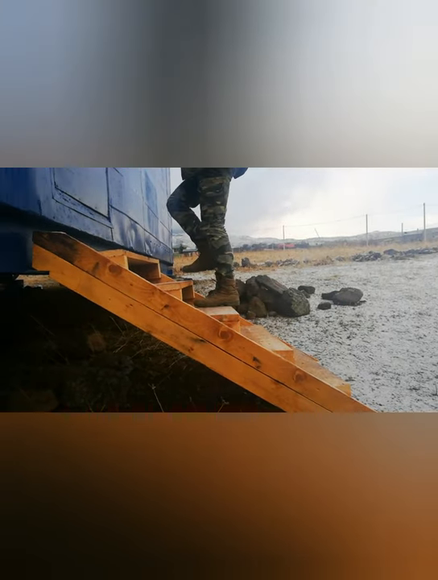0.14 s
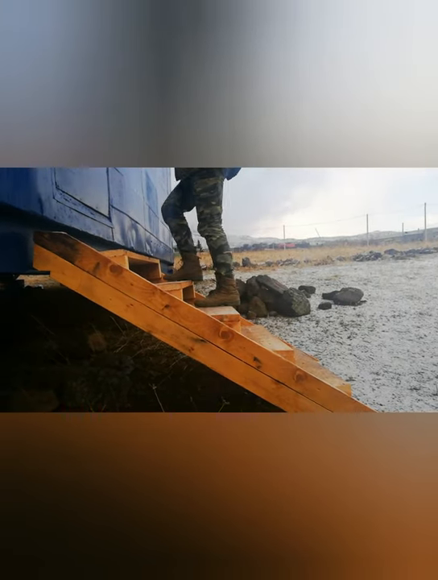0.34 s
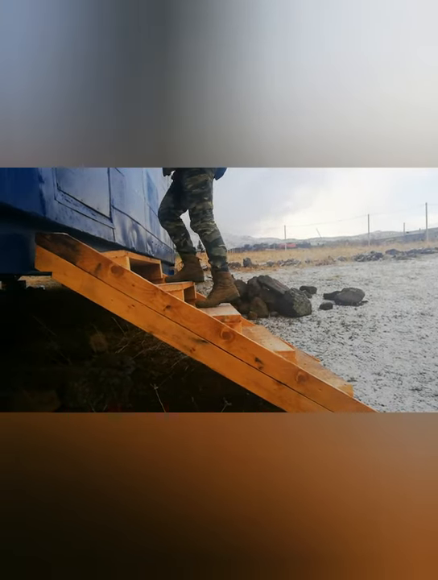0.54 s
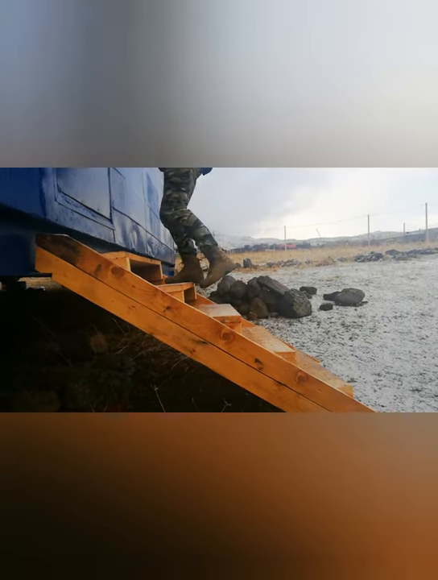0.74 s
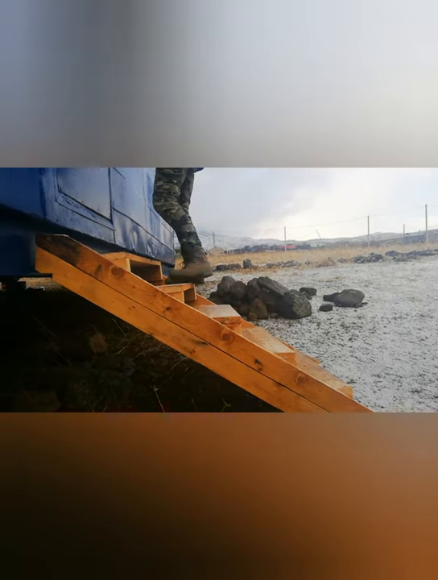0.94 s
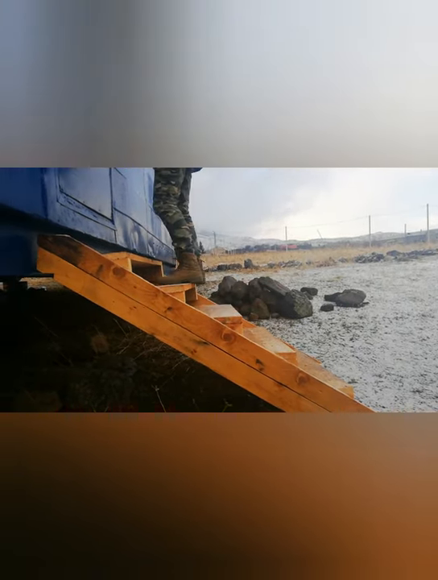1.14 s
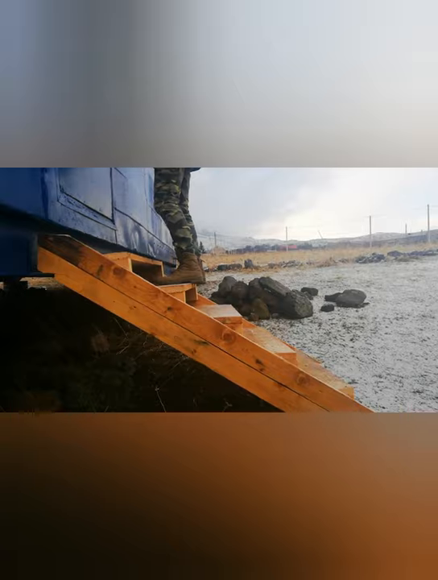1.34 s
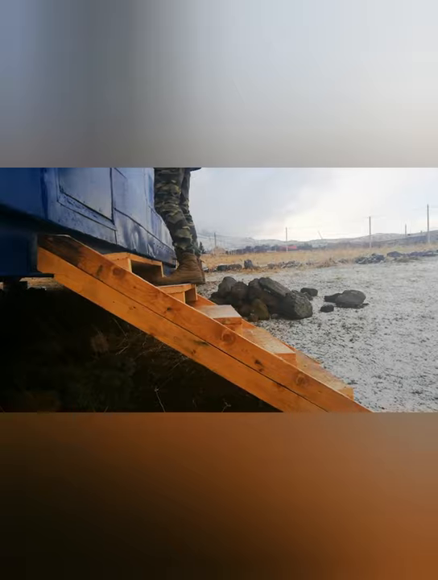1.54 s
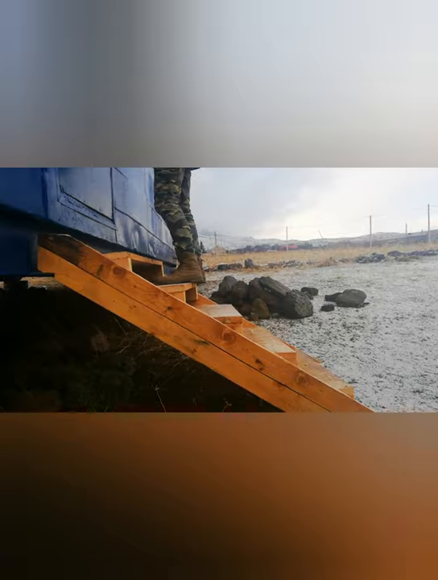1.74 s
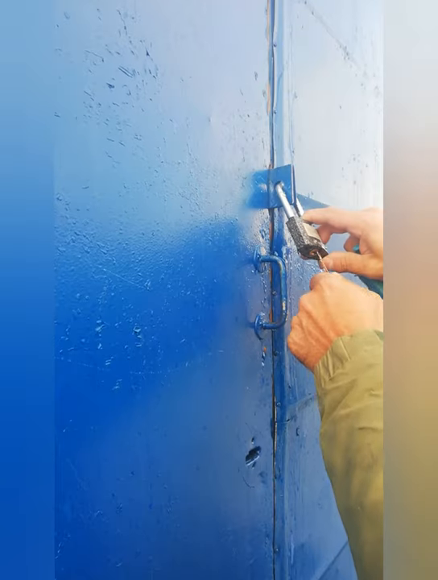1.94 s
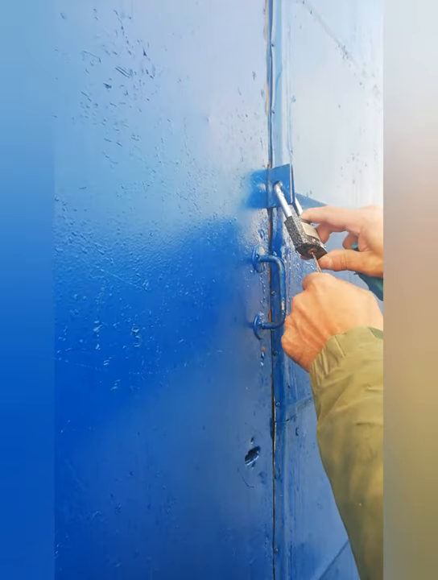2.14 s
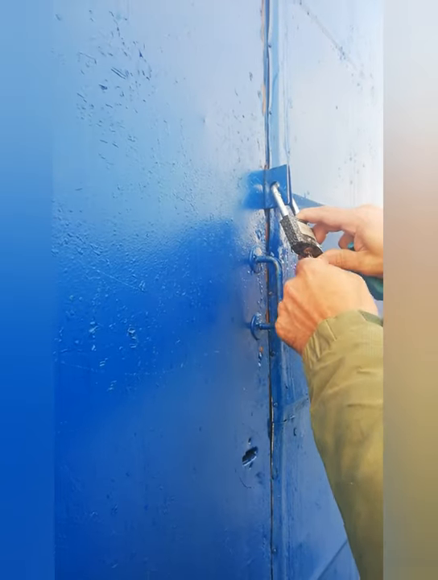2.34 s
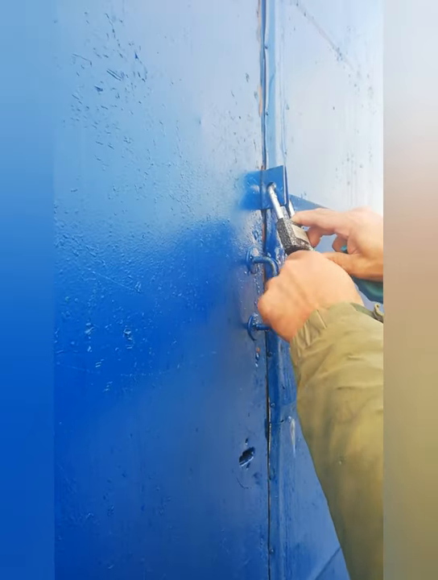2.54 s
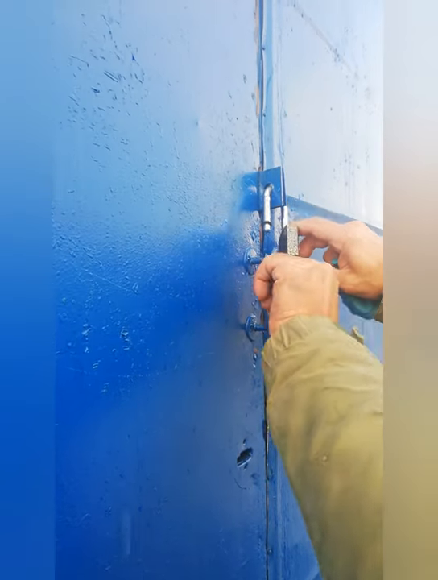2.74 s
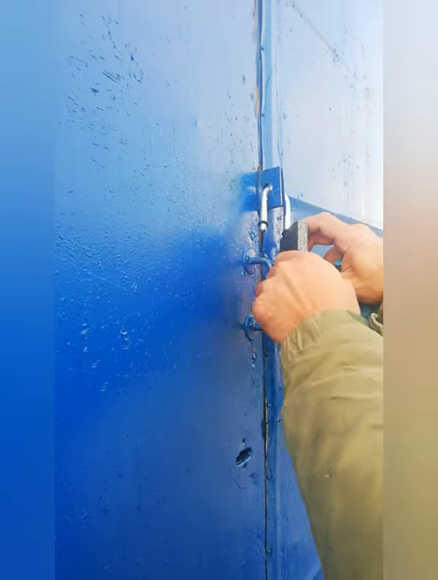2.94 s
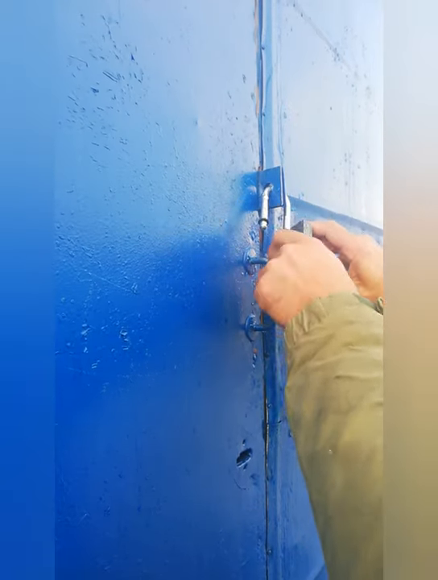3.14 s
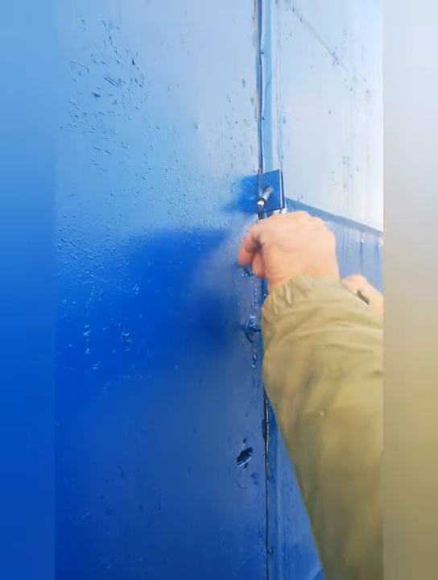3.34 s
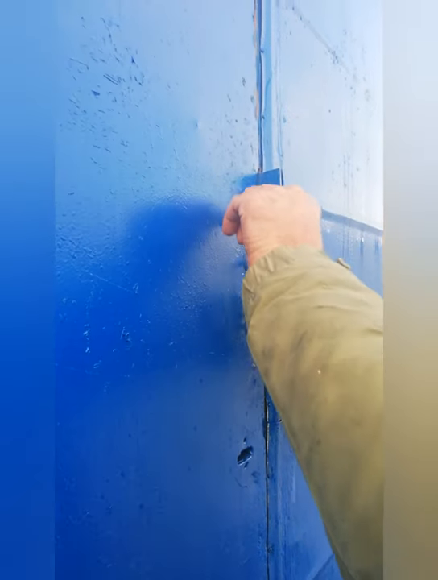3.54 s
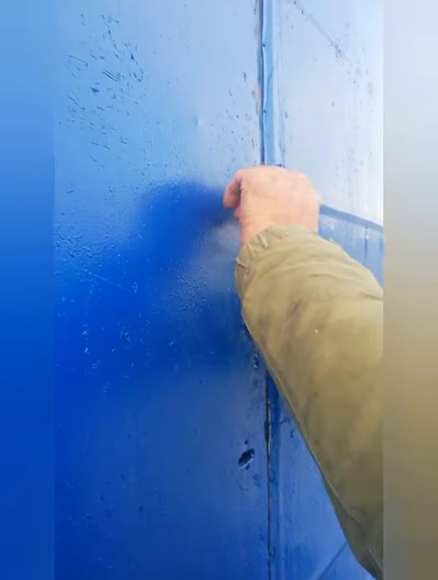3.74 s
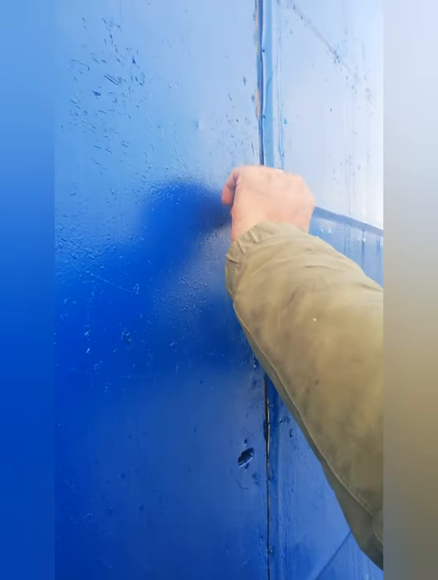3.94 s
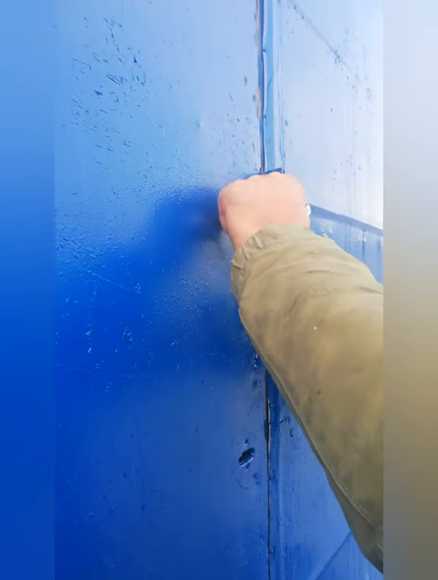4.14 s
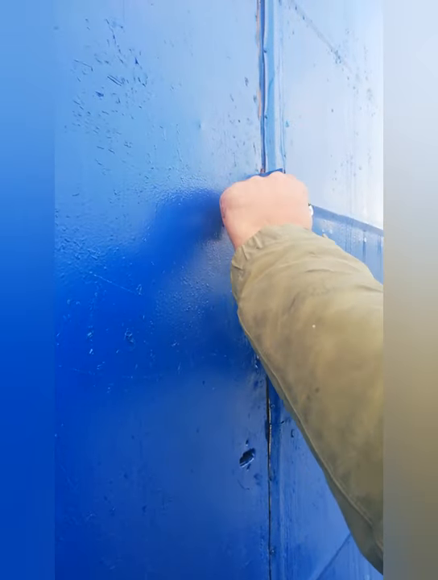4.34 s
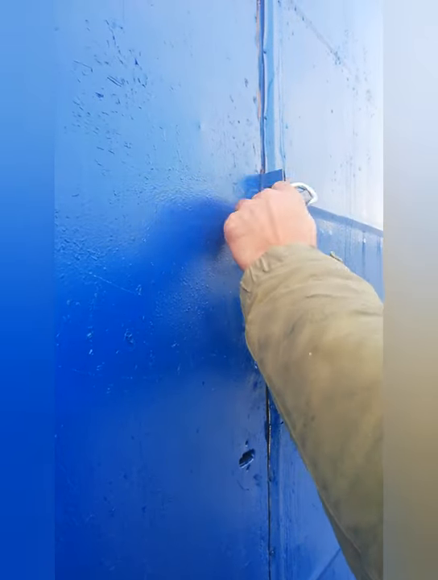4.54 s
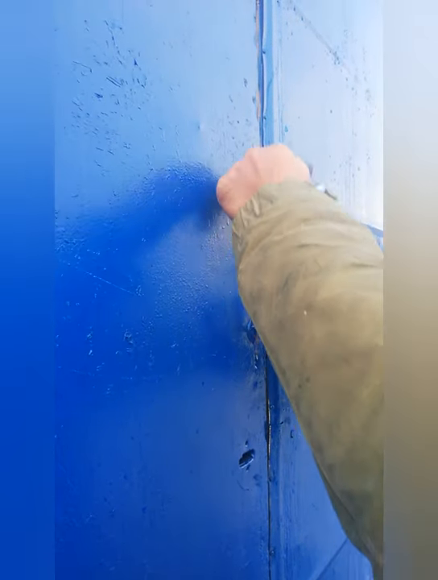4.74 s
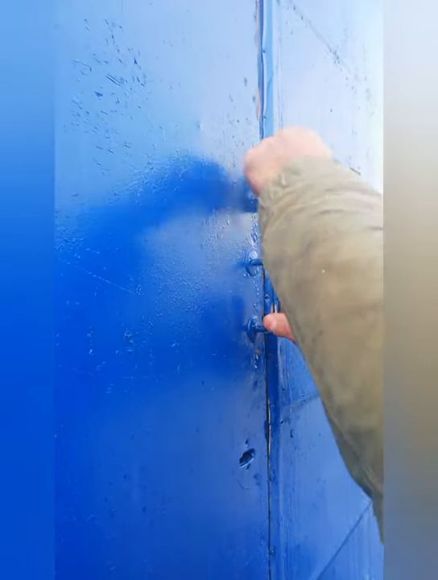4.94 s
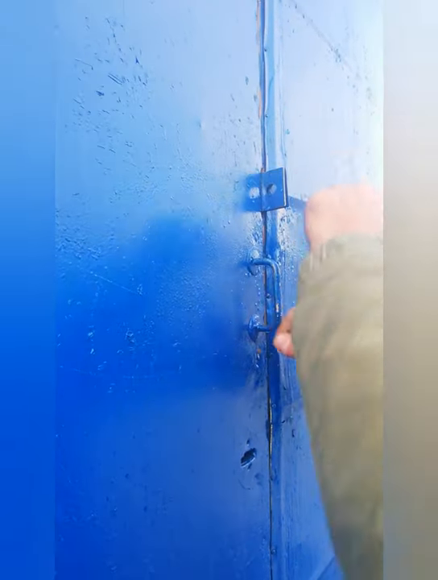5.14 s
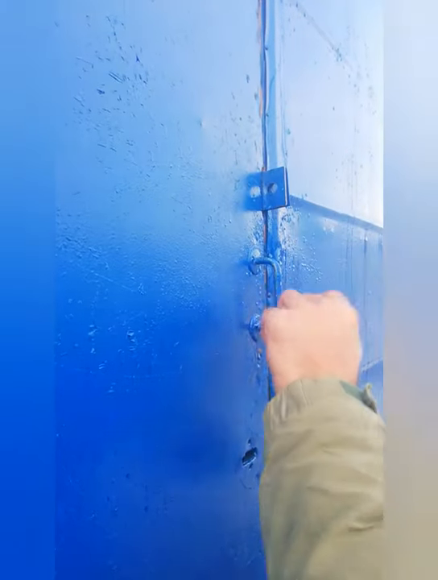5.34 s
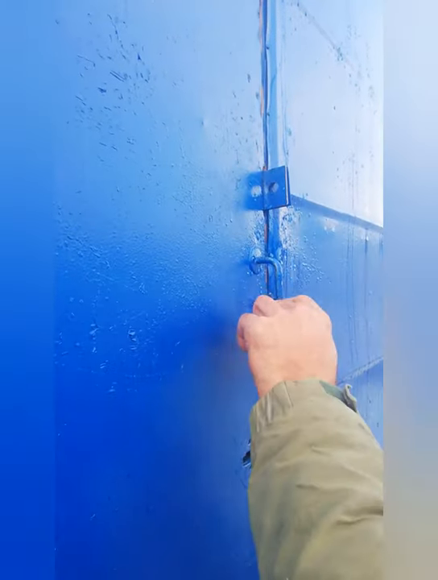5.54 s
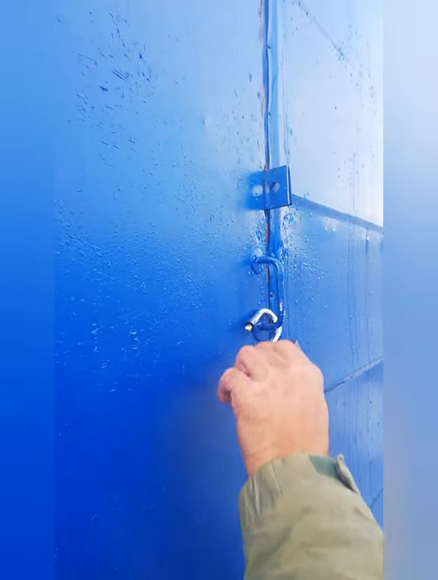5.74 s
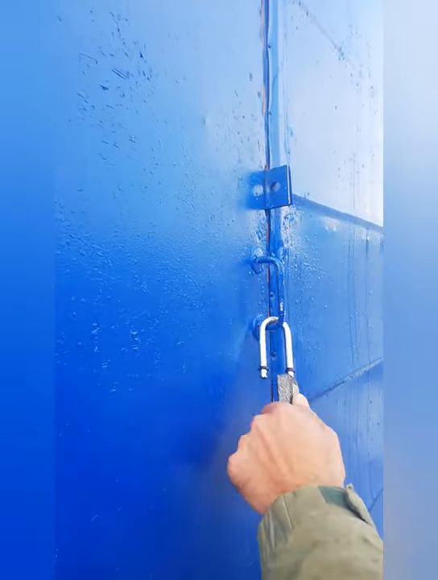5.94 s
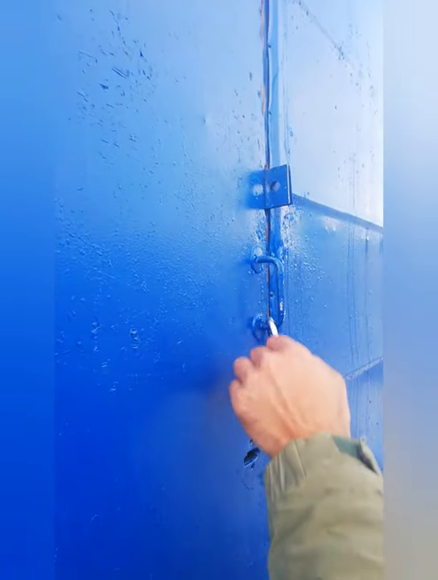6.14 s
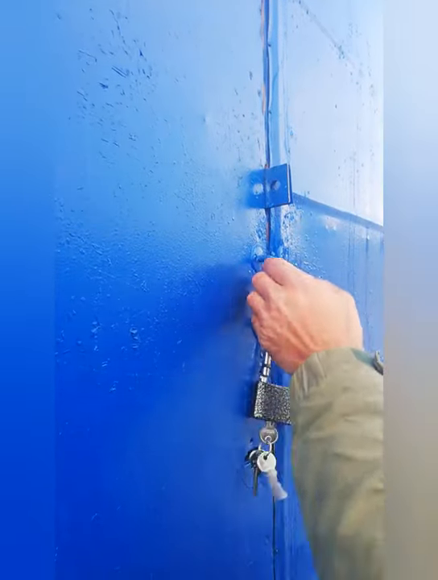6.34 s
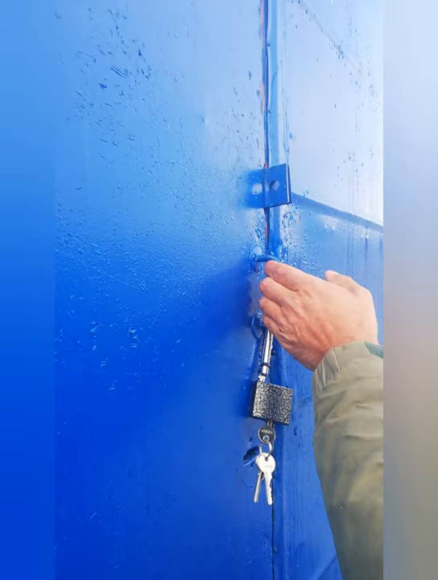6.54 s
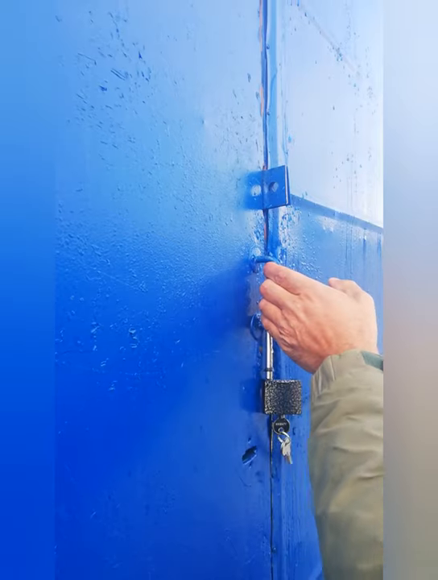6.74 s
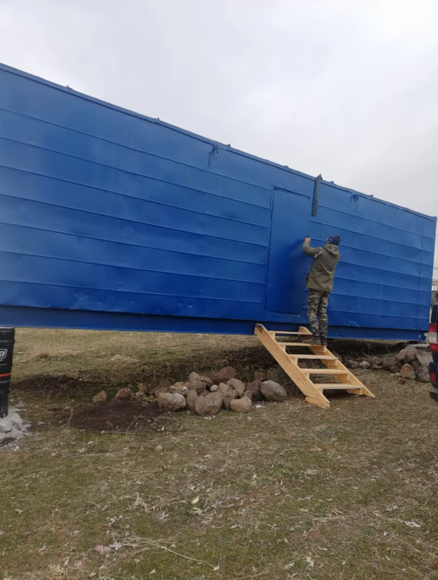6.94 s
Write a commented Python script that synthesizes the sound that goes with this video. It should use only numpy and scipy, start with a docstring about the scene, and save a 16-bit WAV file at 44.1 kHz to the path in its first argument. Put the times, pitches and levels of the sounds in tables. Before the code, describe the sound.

Outdoors, boots scuff on planks among ticking drops; after a cut, sharp metallic padlock clacks rattle against a steel door while small keys jingle brightly.

```python
"""Padlock on a steel door, after boots on wooden steps

Boots climb wooden steps in gusty wind while drops tick nearby. After a brief silence hands work a padlock
off the hasp of a steel door: slips and blows, made of filtered noise and decaying modes, excite lock and
door, and keys clink on their ring as modal sums. Wind, air and drizzle are shaped noise. Two ports listen,
with path difference, shadow and early reflections; the sound ends in silence."""
import sys
import numpy as np
from scipy import signal
from scipy.fft import rfft, irfft, next_fast_len
from scipy.io import wavfile
from scipy.ndimage import uniform_filter1d

SR = 44100
rng = np.random.default_rng(int(sys.argv[2]) if len(sys.argv) > 2 else 0)


def materialize(psi):
    """Save the field psi as 16-bit PCM at rate SR to the path in sys.argv[1].

    A 1-D psi becomes a single channel; in a 2-D psi each row is a channel.
    """
    bounded = np.clip(np.atleast_2d(psi).T, -1, 1)
    quanta = np.round(bounded * 32767).astype(np.int16)
    wavfile.write(sys.argv[1], SR, quanta)


N = 307803
SHORT_S = .08  # usual length of a short sound, s

# modes of the door sheet, decay before the contact scales it: f/Hz, level/dB, t60/s
DOOR_MODES = [(461.7, -7, 0.66), (720, -3, 0.13), (999, 3, 0.11), (1146, 6, 0.027), (1454, -1.5, 0.11),
              (1560, -6.5, 0.07)]
# silences: from t/s, to t/s
SILENCES = [(1.708, 1.805), (6.84, 7)]


def knocks():
    """Impact excitation: a tick, a short clack of the lock, and a slap and longer boom of the door sheet."""
    # lock knocking on hasp and door: t/s, clack peak level/dB, door boom level re clack/dB
    blow_table = [(2.1194, -39, -9), (2.305, -40, -27), (2.339, -49, -45), (2.366, -41.5, -43),
                  (2.386, -32, -18), (2.4061, -19.5, -16.5), (2.427, -23, -9.5), (2.5239, -30, -14),
                  (2.5694, -29, -5), (2.5871, -27.5, -7), (2.6333, -25, -1), (2.6673, -7.5, -35.5),
                  (2.708, -15.5, -6.5), (2.9271, -32.5, -59), (2.9592, -9.5, -39), (2.9744, -23, -49),
                  (3.459, -23, -18), (3.47, -17, -17), (3.479, -22, -16), (3.5154, -17, -14),
                  (3.523, -13, -12), (3.7338, -25.5, -7), (3.765, -20.5, -8.5), (3.8631, -32.5, -12),
                  (4.0483, -10.5, -20.5), (4.2004, -7, -26), (4.3315, -8.5, -44), (4.4445, -30.5, -4),
                  (4.6858, -23.5, -18), (4.7473, -13, -19), (4.774, -19, -9), (4.892, -11, -16),
                  (5.5134, -20.5, 13), (5.7247, -22, -0.5), (5.7449, -8, -9), (5.8046, -23.5, -3.5),
                  (5.8368, -16, -6.5), (5.889, -15.5, -10.5), (5.9021, -14, -5.5), (6.101, -7.5, -4),
                  (6.124, -6, -28), (6.138, -13.5, -37), (6.148, -7, -39), (6.157, -17, -34),
                  (6.3323, -17, -2.5), (6.3918, -5, -36), (6.4303, -9.5, -23.5)]
    # door handle plucked: t/s, level/dB
    pluck_table = [(3.655, -26), (4.895, -24)]
    # modes of the handle: f/Hz, level/dB, t60/s
    handle_modes = [(407.4, -2, 0.38), (701, -17.5, 0.38)]
    usual_db, usual_tick_db = -20, -29  # clack and tick of a usual blow
    tick_growth, tick_dulling = 0.36, 0.33  # dB gained per dB of clack, lost per dB of boom
    deeper_from_s, deeper_db = 6, 10  # from here the lock swings against the lower door: more low thud
    out = np.zeros((2, N))
    for s, db, boom_db in blow_table:
        tick_db = usual_tick_db + tick_growth * (db - usual_db) - tick_dulling * boom_db
        door_db = boom_db + db

        slap = peaked(ring(DOOR_MODES, .3, 0.14, scatter_db=2.5, together=True))
        add(out, s, gain_of(door_db) * (0.26 * door_ring(.3, 0.65) + slap))

        low_thud = gain_of(deeper_db * (s > deeper_from_s)) * tick(43, 310, 0.2, .15)
        thud = low_thud + 4.5 * tick(370, 1300, 0.044, .15)
        add(out, s, gain_of(door_db - 14.5) * thud)

        tail = np.array([tick(200, 900, 0.53, .4) for _ in range(2)])  # independent at the two ports
        add(out, s, gain_of(door_db - 19) * coloured(tail, [(1200, 1.5), (4000, -16.5)]))

        noise = 0.38 * tick(1800, 5200, 0.022) + 0.57 * tick(2500, 7000, 0.0037)
        clack = peaked(lock_ring(0.67, True) + noise)
        add(out, s, gain_of(db) * panned(rng.normal(0, 3.0)) * clack)
        add(out, s, gain_of(tick_db) * panned(rng.normal(0, 4.0)) * tick(8400, 11500, 0.016))
    for s, db in pluck_table:
        add(out, s, gain_of(db) * ring(handle_modes, 0.27, rise=0.0024))
    return out


def grinding():
    """Stick-slip friction: dense slips excite the lock body, hiss on top, and shake the door sheet."""
    # shackle grinding in the hasp: t/s, length/s, place of the peak (0-1), level/dB,
    # door level re that/dB, rumble level re that/dB
    grind_table = [(2.282, 0.2, 0.48, -49.5, -5.5, -7.5), (2.522, 0.29, 0.24, -58, 3, 0.5),
                   (2.623, 0.11, 0.34, -37.5, 5.5, -18), (2.957, 0.097, 0, -47, 1, -9),
                   (3.245, 0.18, 0.22, -44.5, -0.5, -20.5), (3.422, 0.16, 0.27, -50, 10.5, -18),
                   (3.512, 0.12, 0, -40.5, 5, -16), (3.561, 0.14, 0.37, -32, -4, -16),
                   (3.699, 0.057, 0.3, -42, 0, -8), (4.198, 0.078, 0.29, -38.5, 0.5, -2.5),
                   (4.31, 0.098, 0.26, -44.5, 0, -7), (4.74, 0.087, 0.2, -44, -4, -1),
                   (4.817, 0.1, 0.33, -45.5, -8.5, 2), (5.72, 0.097, 0.36, -48, 5, -17),
                   (6.116, 0.15, 0.13, -35, -11.5, -26), (6.38, 0.22, 0.02, -42, 5, -23.5),
                   (6.692, 0.2, 0.14, -50, -1.5, -3)]
    # light sliding: t/s, length/s, level/dB, centre f/Hz, bandwidth f/Hz
    slide_table = [(2.851, 0.067, -53.5, 4620, 493), (4.975, 0.25, -66.5, 5600, 1200),
                   (4.978, 0.63, -61.5, 3500, 5950)]
    usual_db, usual_hiss_db = -45, -56  # grinding and hiss of a usual stroke
    hiss_growth = 0.94  # dB gained per dB of grinding

    def body():
        return lock_ring(0.54) + 1.06 * tick(1500, 6500, .006)

    def hiss():
        return tick(7000, 13500, 0.006)

    def sheet():
        return coloured(door_ring(SHORT_S, 0.25), [(400, -7.5), (1100, 0.5)])

    def rumble():
        return tick(38, 200, 0.23)

    out = np.zeros((2, N))
    for s, seconds, peak, db, door_db, rumble_db in grind_table:
        hiss_db = usual_hiss_db + hiss_growth * (db - usual_db)
        levels_db = [db, hiss_db, db + door_db, db + rumble_db]
        for voice, level_db in zip([body, hiss, sheet, rumble], levels_db):
            add(out, s, gain_of(level_db) * stroke(seconds, voice, 2000, 3.33, peak))
    for s, seconds, db, hz, width_hz in slide_table:
        def slip():
            return tick(hz - width_hz / 2, hz + width_hz / 2, 0.0039)
        add(out, s, gain_of(db) * stroke(seconds, slip, 2300, 2.2, 0.33, 2.5))
    return out


def keys():
    """Damping and re-excitation: each touch ends the keys' ringing and starts it anew; they swing and brush."""
    # keys touching: t/s, short key level/dB, thin key level/dB
    touch_table = [(3.013, -29, -40), (3.1127, -29, -38), (3.1464, -18, -43), (3.1804, -21, -32),
                   (3.2285, -29.5, -44), (3.6716, -39, -22.5), (3.7845, -43.5, -49), (4.2576, -28, -23),
                   (4.274, -18, -38), (4.311, -23, -19), (4.5208, -48, -29), (4.829, -43, -31.5),
                   (4.9274, -45, -27.5), (4.997, -29, -23.5), (5.1776, -30, -24), (5.3924, -26.5, -35),
                   (5.4658, -35, -26), (5.5924, -29.5, -21.5), (5.7273, -30.5, -22), (6.1634, -22, -29),
                   (6.2146, -27, -31), (6.405, -17.5, -49), (6.426, -14.5, -27.5), (6.4435, -16, -20),
                   (6.5955, -23.5, -14), (6.6752, -35.5, -28)]
    # modes of the short, long, ring and thin key in turn: f/Hz, level/dB, t60/s
    key_modes = [
        [(9905, -4, 0.15), (9851, -4, 0.3)],
        [(7755, -2, 0.35), (15430, -3, 0.14)],
        [(8744, 12, 0.12)],
        [(14890, 3.5, 0.069), (15430, -10, .11)],
    ]
    usual_db = -28  # short key at a usual touch
    # the long and ring keys are shaken along: level at a usual touch, dB gained per dB of the short key
    long_db, long_growth = -49.5, 1.47
    ring_db, ring_growth = -38, 0.7
    out = np.zeros((2, N))
    next_touches = [row[0] for row in touch_table[1:]] + [7]
    for (s, short_db, thin_db), after in zip(touch_table, next_touches):
        above_db = short_db - usual_db
        levels_db = [short_db, long_db + long_growth * above_db, ring_db + ring_growth * above_db, thin_db]
        seconds = min(after - s + 0.0062, .3)
        for modes, db in zip(key_modes, levels_db):
            sound = ring(modes, seconds, scatter_db=5.0, rise=0.00088, detune=0.0006)
            sound *= np.minimum(np.arange(len(sound))[::-1] / (0.0075 * SR), 1)  # damped at the end
            swing = rng.standard_normal((2, len(sound)))  # each port hears the swing differently
            swing = uniform_filter1d(uniform_filter1d(swing, 250), 150)
            add(out, s, gain_of(db + 3.0 * evened(swing)) * sound)
        loudest_db = max(levels_db)
        brushing = stroke(0.17, lambda: tick(9600, 13000, .008), 160, 2.0)
        add(out, s, gain_of(loudest_db - 42) * brushing)
        add(out, s, gain_of(loudest_db - 1) * tick(8000, 12500, 0.016))
    for modes in key_modes:  # beneath the clear touches the bunch tinkles faintly
        short_ring = ring(modes, .15, 0.3, rise=.003)
        tinkle = signal.oaconvolve(grit((2, N), 60, 3.0), short_ring[None])[:, :N]
        out += gain_of(-65) * evened(tinkle) * (np.arange(N) > 2.84 * SR)
    return out


def pings():
    """Single-mode resonance: a wide-band click with one decaying mode, faded out within 58 ms."""
    # small ticks with a clear pitch, each over a faint wide click; the one at 5.18 s is the highest and
    # brightest: t/s, mode level/dB, f/Hz, t60/s
    ping_table = [(.236, -32, 4630, 0.0053), (.641, -32, 1250, 0.008), (1.989, -20, 3870, 0.0064),
                  (2.928, -11.5, 4630, 0.0081), (3.149, -44, 2805, 0.31), (5.18, -7.5, 11500, 0.0094),
                  (5.838, -10, 794, 0.043), (5.84, -11.5, 2695, 0.015), (6.435, -33, 2800, 0.17)]
    out = np.zeros(N)
    fade = signal.windows.tukey(int(.116 * SR), .2)[-int(.058 * SR):]
    for s, db, hz, t60 in ping_table:
        add(out, s, ring([(hz, db, t60)], .058) * fade)
        add(out, s, gain_of(db - 15.0) * tick(2500, 15000, 0.0089))
    return out


def boots():
    """Impact and friction: each landing is a low push with a plank knock; soles drag grit over the wood."""
    # soles scuffing the planks: t/s, length/s, level/dB
    scuff_table = [(0.344, 0.059, -50), (0.393, 0.25, -57.5), (1.049, 0.089, -54.5), (1.114, 0.12, -54)]
    # spectrum applied to a scuff's slips: f/Hz, level/dB
    sole_spectrum = [(150, -35), (282, 1.5), (1530, -0.5), (5000, -10.5), (10900, -8), (16000, -24)]
    # soft low thuds on the steps: middle t/s, level/dB, f/Hz
    landing_table = [(0.034, -33, 43.4), (0.312, -24.5, 64.3), (0.368, -26, 64), (.524, -32, 68.8),
                     (0.756, -27.5, 71), (.79, -20, 92), (0.843, -17.5, 75.5), (0.882, -30.5, 60.5),
                     (0.909, -27.5, 112), (1.028, -23, 68.4)]
    plank_modes = [(136.5, 6.3, 0.14), (255.0, 2.2, 0.048)]  # f/Hz, level/dB, t60/s
    out = np.zeros(N)
    for s, seconds, db in scuff_table:
        def slip():
            return coloured(tick(410, 21900, 0.0018), sole_spectrum)
        add(out, s, gain_of(db) * stroke(seconds, slip, 6000, 2.6, 0.18, 2.8))
    for s, db, hz in landing_table:
        turns = np.arange(-1, 1, hz / SR)  # periods from the middle
        push = -np.cos(2 * np.pi * turns - .8) * np.exp(-(turns / 0.498) ** 2)
        add(out, s - 1 / hz, gain_of(db) * push)
        plank = ring(plank_modes, SHORT_S, rise=0.004, detune=0.13)
        add(out, s - .006, gain_of(db - 17.5) * plank)
    return out


def weather():
    """Broadband noise and random impacts: lumpy wind, soft air with fine drizzle, and single drops."""
    # wind on the ports: t/s, level/dB
    wind_levels = [(0, -46), (.2, -54.5), (.65, -51.5), (.85, -39.5), (1.05, -46.5), (1.3, -64.5),
                   (3.7, -61.5), (4.8, -52), (5.3, -67), (6.2, -54.5), (6.84, -56.5)]
    # relative wind spectrum: f/Hz, level per Hz/dB
    wind_spectrum = [(11, -47), (18, -6.5), (48, 4.5), (97, -3), (155, -7.5), (500, -45.5), (650, -88.5)]
    # relative air spectrum: f/Hz, level per Hz/dB
    air_spectrum = [(88, -39.5), (150, -12), (441, -14.5), (1050, -15), (2430, -16), (7440, -21),
                    (9980, -18), (15400, -27), (16300, -35.5)]
    # drops landing close by: t/s, upper band peak level/dB, lower band level re upper/dB
    drop_table = [(0.079, -38, -16), (0.1566, -33.5, -10), (0.2306, -41.5, 6), (0.299, -39, -23),
                  (0.4188, -48, 0), (0.663, -37.5, -17), (0.882, -42, -16), (1.134, -38.5, -9),
                  (1.246, -40.5, -13), (1.4085, -46.5, 2), (1.5624, -45, -21), (1.591, -45, -32)]
    a, b, c, d = rng.standard_normal((4, N))
    apart = np.array([[1], [-1]])  # what differs between the ports
    wind_db = np.interp(np.arange(N) / SR, *np.transpose(wind_levels))
    wind = gain_of(wind_db) * evened(coloured(a + 0.47 * apart * b, wind_spectrum))
    air = gain_of(-61.5) * evened(coloured(c + 1.0 * apart * d, air_spectrum))

    drizzle = np.zeros((2, N))
    for band_hz in [(4500, 14000), (7500, 11500), (8500, 13500)]:  # large to fine droplets
        drizzle += signal.oaconvolve(grit((2, N), 33, 4.6), tick(*band_hz, 0.022)[None])[:, :N]
    after_silence = np.arange(N) > SILENCES[0][1] * SR  # the drizzle is fainter after the first silence
    out = wind + air + gain_of(-60.5 - 8.0 * after_silence) * evened(drizzle)

    for s, db, low_db in drop_table:
        drop = tick(8800, 12000, 0.044) + gain_of(low_db) * tick(2800, 6100, 0.045)
        add(out, s, gain_of(db) * panned(rng.normal(0, 10.0)) * drop)
    return out


def placed(x):
    """Interaural-like delay, shadowing and early reflections off door, ground and moving arms."""
    # where the sound comes from: until t/s, lag of left behind right/samples, share of the shadow (0-1)
    place_table = [(1.75, -4, 0), (5.3, -8, 1), (7, 28, 1)]
    # full shadow: f/Hz, left-right level difference/dB
    shadow = [(60, 0.0), (130, 0.0), (290, -0.5), (640, -0.5), (1410, -3.0), (3100, -10.0), (6820, -3.0),
              (15000, -6.0)]
    out, t, start = np.zeros((2, N)), np.arange(N) / SR, 0
    for until, lag, share in place_table:
        left, right = x * ((t >= start) & (t < until))
        left = np.roll(coloured(left, shadow, share / 2), lag)
        out += [left, coloured(right, shadow, -share / 2)]
        start = until

    shape = (3, 2, 6000)  # echo patterns, ports, samples
    sparse = rng.standard_normal(shape) * (rng.random(shape) < .05)
    taps = sparse * gain_of(-60 * np.arange(6000) / SR / 0.071)
    taps[..., :170] = 0  # the nearest surface is a few milliseconds away
    taps = coloured(taps, [(200, -40), (600, 0), (5000, 0), (10000, -8)])
    taps /= np.linalg.norm(taps, axis=-1, keepdims=True)
    phases = np.arange(3)[:, None, None] / 3
    turns = np.sqrt(2 / 3) * np.cos(np.pi * (1.7 * t + phases))  # the echo pattern drifts at constant power
    echoes = signal.oaconvolve(turns * out, taps, axes=-1).sum(0)[:, :N]
    return out + gain_of(-7.0) * echoes


def lock_ring(factor, together=False):
    """Modal synthesis: the lock body's resonances, each mode decaying faster the wider it is."""
    # lock and hasp body: f/Hz, nominal width f/Hz (sets the decay), level/dB
    body_table = [(2530, 116, 5), (3268, 111, 9), (3814, 71, 4.5), (5160, 203, 9)]
    modes = [(hz, db, 1.2 / width) for hz, width, db in body_table * 2]
    return peaked(ring(modes, SHORT_S, factor, scatter_db=4.5, detune=0.045, together=together))


def door_ring(seconds, factor):
    """High modal density: the door sheet is dense with modes, and each contact wakes other ones."""
    return peaked(ring(DOOR_MODES * 8, seconds, factor, scatter_db=3.0, rise=0.00011, detune=0.09))


def stroke(seconds, voice, per_s, spread_db, peak=0.28, uneven_db=6.0):
    """Friction as a slip train: uneven pressure weights random slips through three versions of the voice."""
    size = int(seconds * SR)
    warp = np.log(.5) / np.log(np.clip(peak, .05, .9))  # moves the greatest pressure to the peak
    u = np.linspace(0, 1, size) ** warp
    unevenness = evened(uniform_filter1d(rng.standard_normal(size), 500))
    pressure = np.sin(np.pi * u) ** 2.42 * gain_of(uneven_db * unevenness)
    sound = 0
    for _ in range(3):  # so that no colour stands still
        sound = sound + signal.oaconvolve(pressure * grit(size, per_s / 3, spread_db), voice())
    return sound / np.sqrt((sound ** 2).sum() / size + 1e-20)


def ring(modes, seconds, factor=1, scatter_db=0, rise=0.00056, detune=0, together=False):
    """Modal sum of dying sines, levels and pitches scattered; the modes start in phase when asked (together)."""
    hz, db, t60 = np.transpose(modes)[:, :, None]
    luck = rng.standard_normal((3, len(modes), 1))  # level, phase, frequency: where the blow lands
    t = np.arange(int(seconds * SR)) / SR
    turns = hz * (1 + detune * luck[2]) * t + luck[1] * (not together)
    decay = gain_of(db + scatter_db * luck[0] - 60 * t / abs(t60 * factor))
    waves = decay * np.sin(2 * np.pi * turns)
    return waves.sum(0) * (1 - np.exp(-t / rise))


def tick(lo_hz, hi_hz, t60, seconds=SHORT_S):
    """Band-limited transient: a decaying noise burst through a band-pass, at peak 1."""
    t = np.arange(int(seconds * SR)) / SR
    band = signal.butter(2, [lo_hz, hi_hz], "bandpass", fs=SR, output="sos")
    burst = rng.standard_normal(len(t)) * gain_of(-60 * t / t60)
    return peaked(signal.sosfilt(band, burst))


def grit(size, per_s, spread_db):
    """Random impulse process: clicks at a mean rate, a few of them large."""
    heights = gain_of(spread_db * np.minimum(rng.exponential(1, size), 4))
    return rng.standard_normal(size) * heights * (rng.random(size) < per_s / SR)


def coloured(x, points, slope=1):
    """Linear filtering by a spectrum of (f/Hz, level/dB) points; slope scales the decibels."""
    size = next_fast_len(x.shape[-1])
    hz, db = np.transpose(points)
    shape = np.interp(np.log(np.fft.rfftfreq(size, 1 / SR) + 1), np.log(hz + 1), db)
    return irfft(rfft(x, size) * gain_of(slope * shape), size)[..., :x.shape[-1]]


def gain_of(db):
    """Logarithmic level: decibels to amplitude gain."""
    return 10 ** (np.asarray(db) / 20)


def evened(x):
    """Power normalisation: scales to rms 1."""
    return x / np.sqrt(np.mean(x ** 2) + 1e-20)


def peaked(x):
    """Amplitude normalisation: scales to peak 1."""
    return x / abs(x).max()


def panned(db):
    """Level difference between ports: gains of left and right."""
    return gain_of([[db / 2], [-db / 2]])


def add(mix, s, sound):
    """Superposition: mixes a sound in at s seconds."""
    part = mix[..., round(s * SR):][..., :sound.shape[-1]]
    part += sound[..., :part.shape[-1]]


def scene():
    """Superposition of all sources at their places, in the weather."""
    return placed(knocks() + grinding() + keys() + pings() + boots()) + weather()


def record(dry):
    """Saturation of the loudest peaks, two silences, then low-pass filtering."""
    edge_hz = 16100
    t = np.arange(N) / SR
    running = np.prod([(t < a) | (t > b) for a, b in SILENCES], axis=0)
    rounded = dry / (1 + abs(dry / .9) ** 4) ** .25
    lowpass = signal.firwin(255, edge_hz, window=("kaiser", 9), fs=SR)
    return signal.oaconvolve(rounded * running, lowpass[None], "same")


dry = scene()
out = record(dry)
materialize(out)
```